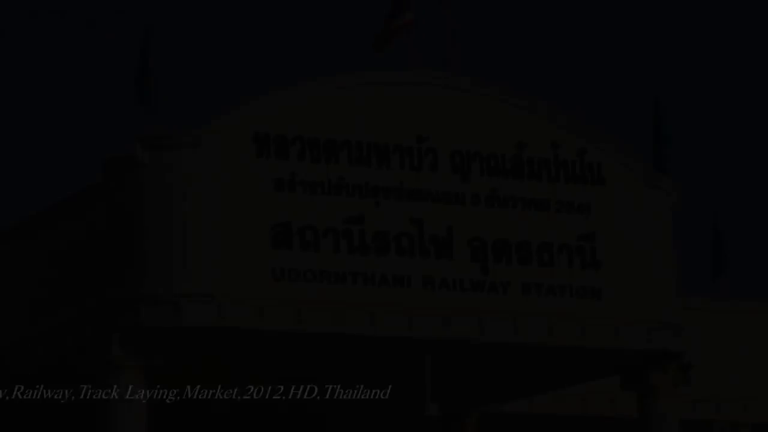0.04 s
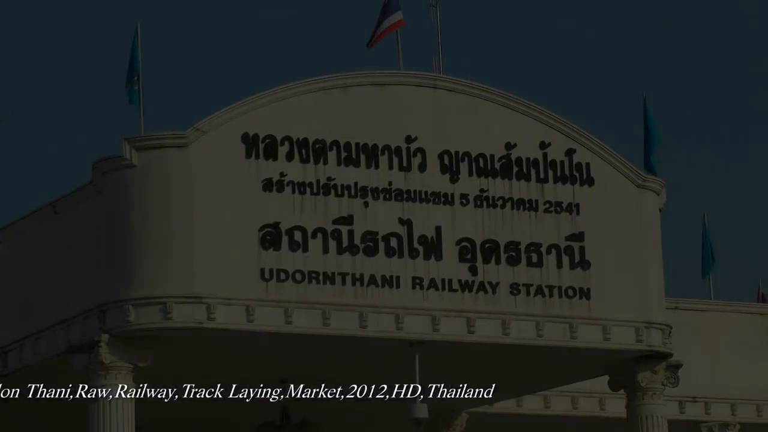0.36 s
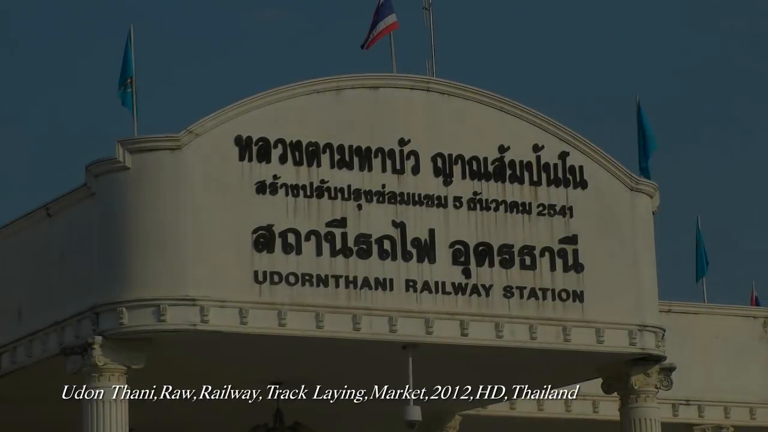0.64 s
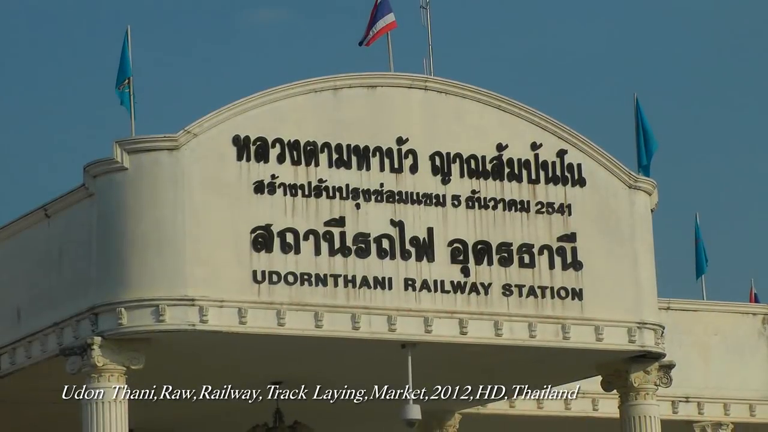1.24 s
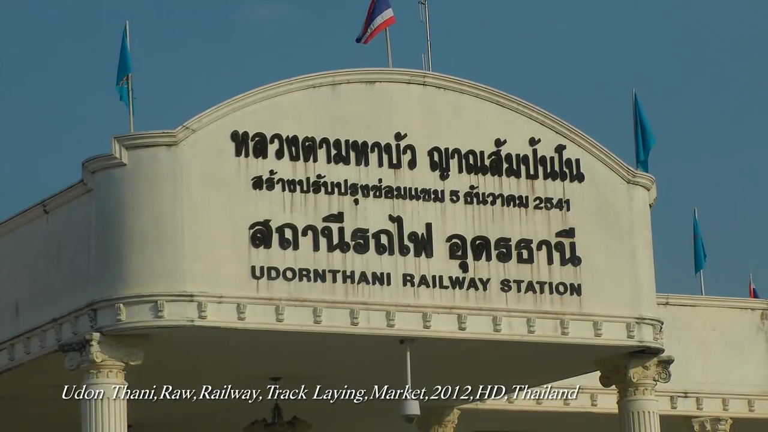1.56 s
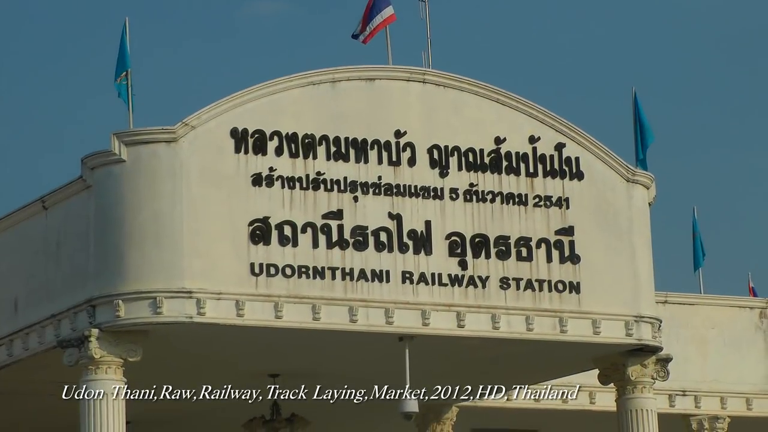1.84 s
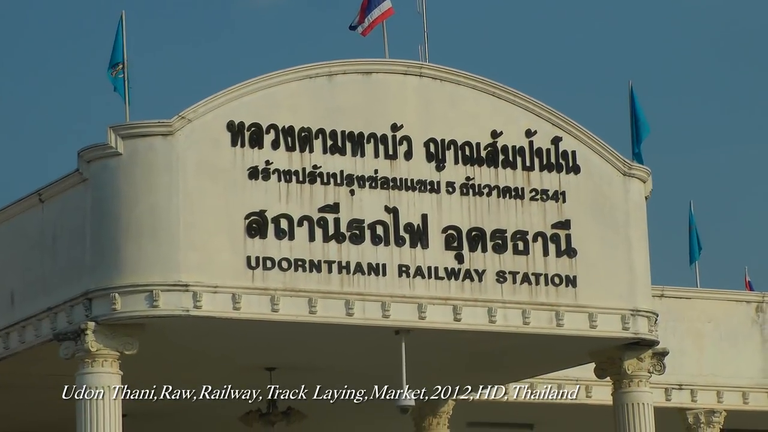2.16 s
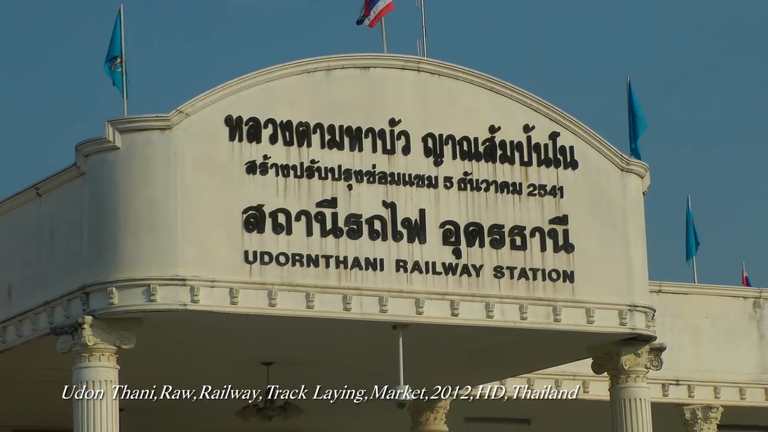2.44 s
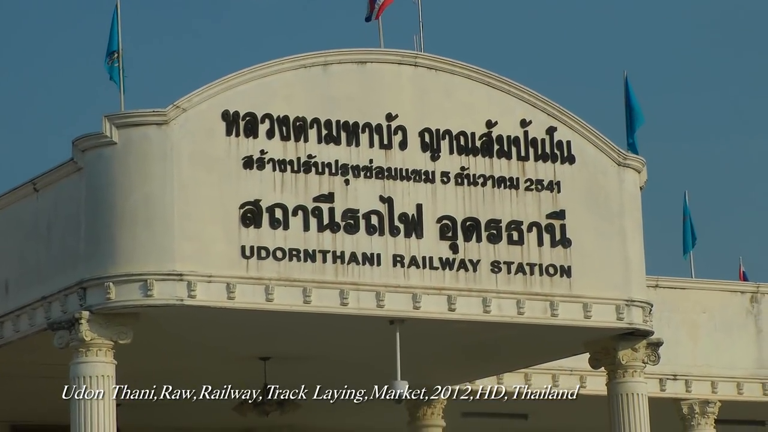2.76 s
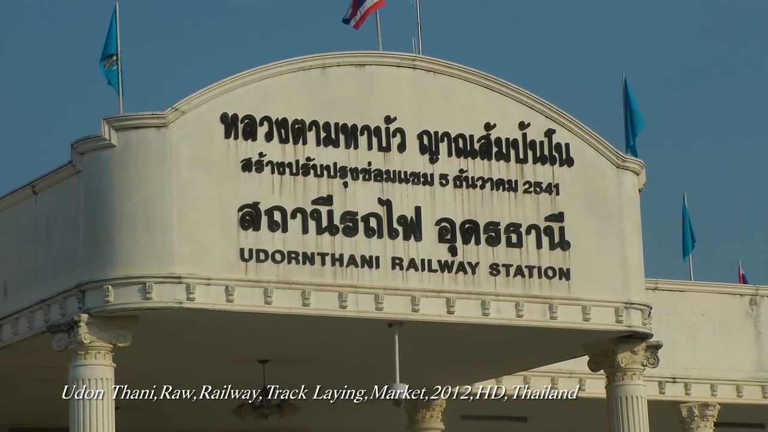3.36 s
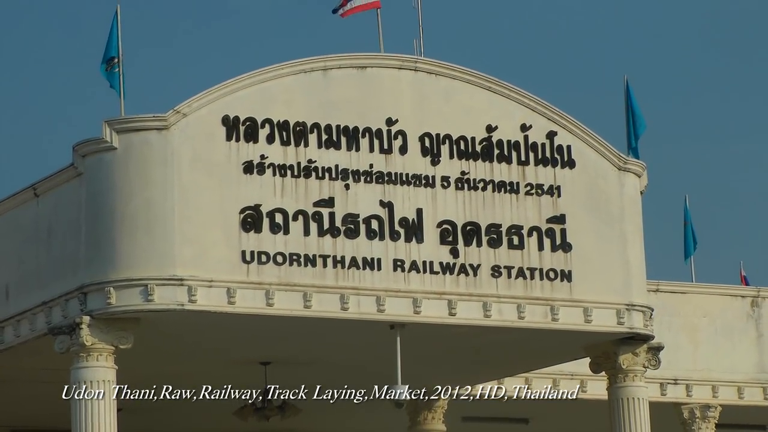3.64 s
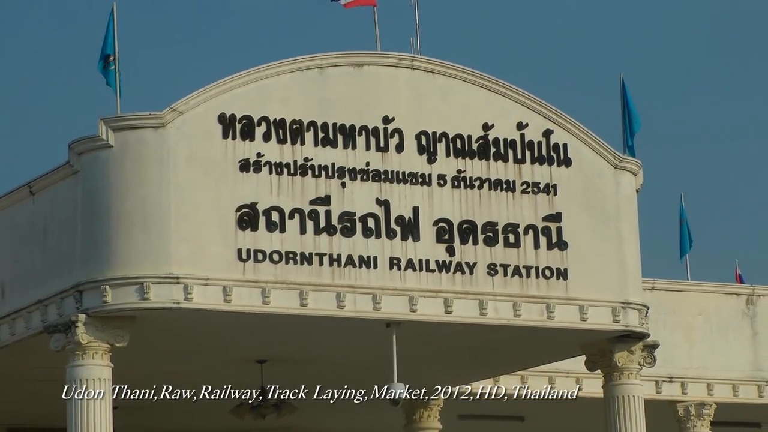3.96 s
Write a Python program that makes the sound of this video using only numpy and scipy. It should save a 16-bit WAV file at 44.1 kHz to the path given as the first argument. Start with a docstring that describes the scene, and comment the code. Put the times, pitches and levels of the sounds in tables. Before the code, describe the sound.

A low engine rumbles and gradually revs up over outdoor traffic noise and hiss.

```python
"""A four-cylinder engine pulls away in a station forecourt, climbing from about 1150 to 1850 rpm.
Its firings ring the exhaust pipe, gas noise chuffs once a turn, crankshaft orders boom as they cross
pipe resonances, and now and then the exhaust kicks with a dull thump. Behind it sits a bed of machine
hum, traffic rumble and bright street hiss, dotted with ticks, two thin whines and a faint squeal.
The whole scene fades in over the first second."""
import sys
import numpy as np
from scipy import signal
from scipy.fft import rfft, irfft, next_fast_len
from scipy.io import wavfile
from scipy.ndimage import map_coordinates

SR = 44100
rng = np.random.default_rng(int(sys.argv[2]) if len(sys.argv) > 2 else 0)


def generate_wav(sig):
    """Save sig (samples, or channels by samples) to the path in sys.argv[1] as 16-bit PCM at SR."""
    pcm = np.round(np.clip(np.atleast_2d(sig).T, -1, 1) * 32767).astype(np.int16)
    wavfile.write(sys.argv[1], SR, pcm)


N = 176400
T = np.arange(N) / SR


def amp(db):
    """Decibels to gain."""
    return 10 ** (np.asarray(db) / 20)

def unit(x):
    """Normalise to rms 1."""
    return x / np.sqrt(np.mean(x ** 2) + 1e-20)

def curve_at(points, hz):
    """Read a curve of (f/Hz, value) points on a log frequency axis."""
    freqs, values = np.transpose(points)
    return np.interp(np.log(hz + 1), np.log(freqs + 1), values)

def automation(rows):
    """One automation lane, a value per sample, for each column after the time."""
    times, *columns = np.transpose(rows)
    return [np.interp(T, times, column) for column in columns]

def wobble(rate):
    """A smooth random modulator with `rate` knots a second."""
    return map_coordinates(rng.standard_normal(1024), [T * rate], mode="wrap")

def eq(x, response):
    """Zero-phase EQ; `response` maps frequency to gain."""
    size = next_fast_len(N + SR // 2)
    return irfft(rfft(x, size) * response(np.fft.rfftfreq(size, 1 / SR)), size)[..., :N]

def ring(x, spectrum, size=16384):
    """Let x excite a resonant body: a minimum-phase filter with the given spectrum."""
    cepstrum = irfft(np.log(amp(curve_at(spectrum, np.fft.rfftfreq(size, 1 / SR)))))
    causal_fold = np.r_[1, np.full(size // 2 - 1, 2), np.zeros(size // 2)]
    impulse_response = irfft(np.exp(rfft(cepstrum * causal_fold)))
    return signal.fftconvolve(x, impulse_response)[:N]

def noise_band(centre, width):
    """A bell-shaped band of noise, rms 1."""
    return unit(eq(rng.standard_normal(N), lambda hz: np.exp(-((hz - centre) / width) ** 2 / 2)))

def tone(hz, db, waver_db, slip_rad):
    """One partial, wavering a little in level and phase."""
    gain = np.sqrt(2) * amp(db + waver_db * wobble(3.79))
    return gain * np.sin(2 * np.pi * (hz * T + rng.random()) + slip_rad * wobble(5.07))

# stereo width of the noise layers: f/Hz, side against mid/dB
NOISE_WIDTH = [(30, -3), (60, -18), (150, -19.5), (230, -25.5), (400, -20), (600, -14.5), (1000, -6),
               (1450, -7.5), (2000, -13), (3300, -3), (4200, -15), (5000, -26), (6000, -9.5), (7200, -31),
               (9500, -9), (13000, -2), (15000, -6)]
def stereo_noise(spectrum):
    """Coloured noise of rms 1, nearly mono in the upper bass and low mids."""
    def mid_side_gains(hz):
        mid_db = curve_at(spectrum, hz)
        return amp([mid_db, mid_db + curve_at(NOISE_WIDTH, hz)])
    mid, side = eq(rng.standard_normal((2, N)), mid_side_gains)
    return unit(np.array([mid + side, mid - side]))

# accent of each firing in the cycle: level/dB
FIRING_ACCENTS = [-6, -5.5, -4, -5]
# lateness of each firing at the tailpipe: delay/firing intervals
FIRING_LAG = [0.0019, 0.0996, 0.0095, 0.1194]
# tone of the exhaust pipe and body: f/Hz, gain/dB
PIPE_EQ = [(25, -36), (42, -39), (58, -15.5), (90, -21.5), (125, -11), (170, -5), (225, 2.5), (265, -5.5),
           (320, -0.5), (420, -6.5), (490, -19), (560, -11), (750, -20.5), (900, -32.5), (1500, -40.5),
           (4000, -91)]
def firings(turns, scatter_db, jitter_s, count=256):
    """Two exhaust pulses a turn ring the pipe, uneven from cylinder to cylinder."""
    firing = np.arange(count)
    timing_spread, level_spread = rng.standard_normal((count, 2)).T
    due_turns = (firing + np.take(FIRING_LAG, firing, mode="wrap")) / 2
    onsets = np.interp(due_turns, turns, T, right=2 * T[-1]) + jitter_s * timing_spread
    gains = amp(np.take(FIRING_ACCENTS, firing, mode="wrap") + scatter_db * level_spread)
    pulses = np.bincount(np.abs(onsets * SR).astype(int), gains, N)[:N]
    return unit(ring(pulses, PIPE_EQ))

# colour of the exhaust gas noise: f/Hz, level/dB
GAS_SPECTRUM = [(25, -52), (70, -24), (130, -9), (215, 0.5), (270, -1), (320, -5.5), (420, -2.5),
                (490, -13), (570, -10), (780, -20), (920, -36), (2000, -20.5), (8000, -50)]
def chuff(turns, depth_db):
    """Rushing exhaust gas that pumps once a crankshaft turn."""
    pump_db = depth_db * np.cos(2 * np.pi * (turns - .1))
    return unit(stereo_noise(GAS_SPECTRUM) * amp(pump_db))

# strong crankshaft orders: multiple of crank speed, level/dB ahead of the pipe
CRANK_ORDERS = [(2, -33), (3, -33), (4, -27), (5, -27), (6, -26.5), (7, -32), (8, -29.5), (9, -27.5),
                (10, -32), (11, -28.5), (12, -31), (13, -30), (14, -33), (15, -32), (16, -33), (17, -35)]
# narrow pipe resonances: f/Hz, half-width/Hz, boost/dB
PIPE_BOOMS = [(167, 6, 4), (223, 7, 5.5), (241, 6, 2), (445, 28, 7)]
def drone(speed, turns, waver_db, slip_rad):
    """Clean engine orders that boom as they sweep through the resonances of the pipe."""
    out = np.zeros(N)
    for order, db in CRANK_ORDERS:
        hz = order * speed
        boom_db = sum(boost / (1 + ((hz - centre) / width) ** 2) for centre, width, boost in PIPE_BOOMS)
        phase = 2 * np.pi * (order * turns + rng.random()) + slip_rad * wobble(8)
        out += amp(db + curve_at(PIPE_EQ, hz) + boom_db + waver_db * wobble(5.04)) * np.cos(phase)
    return out

# the rev climb: t/s, crankshaft speed/Hz
REVS = [(0, 19.1), (1.05, 20), (1.45, 19.7), (1.85, 22.6), (2.05, 22.8), (2.36, 24.3), (2.68, 25.9),
        (3.01, 27.8), (3.17, 29.7), (3.34, 28.7), (3.5, 29.2), (3.7, 30), (3.83, 29.8), (4, 31.1)]
# engine load as a fader ride: t/s, level/dB, extra drone level/dB
LOAD_RIDE = [(0, -5.5, -4), (1.1, -4.5, -1.5), (1.65, -3.5, -1), (1.74, -3, 0), (1.8, -8, -1),
             (1.87, -3, -1.5), (2.03, -1.5, -2), (2.17, -3.5, -1), (2.37, -3, 5), (2.62, -2, 3.5),
             (2.88, -2.5, 1), (3.02, -1.5, 3), (3.2, 0, 5), (3.32, -1.5, 2), (3.45, -.5, 3),
             (3.57, -2, 3.5), (3.68, 0, 4.5), (3.84, .5, 4), (4, 0, 2.5)]
def engine():
    """Firings, chuff and drone, locked to one crankshaft and swelling with the load."""
    speed, = automation(REVS)
    load_db, drone_db = automation(LOAD_RIDE)
    turns = np.cumsum(speed) / SR
    chug = amp(-30.5) * firings(turns, scatter_db=2.5, jitter_s=0.00016)
    breath = amp(-28.5) * chuff(turns, depth_db=3)
    boom = amp(drone_db) * drone(speed, turns, waver_db=2, slip_rad=0.2)
    return amp(load_db) * (chug + breath + boom)

# partials of the machine hum: f/Hz, level/dB
HUM_PARTIALS = [(76, -50), (100, -51.5), (200, -32.5), (224, -40.5), (300, -39.5), (400.5, -36),
                (587, -52.5), (785, -57)]
def machine_hum():
    """A machine running at constant speed holds a steady chord under the scene."""
    return sum(tone(hz, db, waver_db=-2.5, slip_rad=0.29) for hz, db in HUM_PARTIALS)

# colour of the street hiss: f/Hz, level/dB
HISS_SPECTRUM = [(300, -19.5), (700, -14.5), (950, -12.5), (1200, -9.5), (1310, -14.5), (1440, -3.5),
                 (1560, -14), (1720, -1), (2000, -0.5), (2600, -3.5), (3000, -11), (3400, -14), (4000, -5),
                 (5000, -7.5), (6100, -17), (6800, -12.5), (8700, -14.5), (11000, -21), (13000, -26),
                 (15500, -45)]
# fader ride on the hiss: t/s, level/dB, treble shelf/dB
HISS_RIDE = [(0, -37, 1.5), (.5, -35.5, 0), (1.1, -35.5, 0), (2.1, -35.5, 0.5), (2.27, -33.5, 1),
             (2.5, -34.5, -2), (2.62, -35, 1), (2.8, -35, 0.5), (3.08, -33.5, 1), (3.4, -34.5, 0),
             (3.55, -36, 0), (4, -35.5, 0)]
def street_hiss(flutter_db=1.0, shelf_hz=5870):
    """Bright, restless street air: the level flutters and the treble drifts."""
    level_db, shelf_db = automation(HISS_RIDE)
    hiss = stereo_noise(HISS_SPECTRUM)
    treble = eq(hiss, lambda hz: hz ** 4 / (hz ** 4 + shelf_hz ** 4))
    shelved = hiss + (amp(shelf_db) - 1) * treble
    return shelved * amp(level_db + flutter_db * wobble(60))

# colour of the traffic: f/Hz, level/dB
TRAFFIC_SPECTRUM = [(15, -73), (25, -43), (43, -31), (64, -24), (112, -11.5), (198, -2.5), (263, -4),
                    (301, -6), (340, -3.5), (395, -9.5), (487, -16.5), (583, -13), (647, -18.5), (763, -16),
                    (900, -30), (1170, -64), (1980, -120)]
def traffic_rumble(level_db=-28.5, swell_db=1):
    """Traffic blurred into a low, gently heaving bed of noise."""
    return amp(level_db + swell_db * wobble(8.7)) * stereo_noise(TRAFFIC_SPECTRUM)

# ticks and short spits of hiss: t/s, f/Hz, width/Hz, decay/s, level/dB
TICK_CUES = [(.322, 8330, 3000, .05, -29.5), (2.21, 9000, 3040, .08, -46), (2.286, 2700, 298.3, .03, -33),
             (2.391, 6300, 850, .007, -28.5), (2.848, 1950, 200, .02, -33), (3.015, 5487, 500, 0.059, -40)]
def ticks(attack_s=0.0015):
    """Bursts of bright noise with a sharp attack and a short tail."""
    out = np.zeros(N)
    for start, centre, width, decay, db in TICK_CUES:
        age = np.maximum(T - start, 0)
        envelope = (1 - np.exp(-age / attack_s)) * np.exp(-age / decay)
        out += amp(db) * noise_band(centre, width) * envelope
    return out

# high whines, cued at their crests: t/s, spread/s, f/Hz, level/dB
WHINE_CUES = [(1.335, 0.14, 12750, -63), (1.69, .09, 12800, -64)]
def whines(width_hz=150):
    """Thin bands of noise at the very top that swell and fade."""
    return sum(amp(db) * noise_band(hz, width_hz) * np.exp(-((T - crest) / spread) ** 2 / 2)
               for crest, spread, hz, db in WHINE_CUES)

# hard exhaust kicks: t/s, peak level/dB
THUMP_CUES = [(1.722, -17), (1.756, -17), (1.847, -17), (1.892, -16), (2.508, -15), (3.4, -14),
              (3.434, -12), (3.449, -12), (3.468, -10), (3.503, -12), (3.654, -12), (3.671, -14),
              (3.802, -13), (3.868, -13), (3.966, -11)]
# body of a thump: f/Hz, gain/dB
THUMP_EQ = [(30, -40), (90, -21), (160, 3), (230, -1.5), (350, -0.5), (440, -9), (520, -21), (750, -19),
            (950, -39), (3000, -82)]
def exhaust_thumps():
    """Now and then the exhaust kicks harder, with a short dull thump."""
    kicks = np.zeros(N)
    for start, db in THUMP_CUES:
        kicks[round(start * SR)] = amp(db)
    body_peak = np.abs(ring(signal.unit_impulse(N), THUMP_EQ)).max()
    return ring(kicks, THUMP_EQ) / body_peak

# inharmonic partials of the squeal: f/Hz, level/dB, fall/(dB per s)
SQUEAL_PARTIALS = [(1028, -52, 14), (1443, -51, 10), (1793, -54, 0), (1977, -46, 6), (2110, -52, 0),
                   (2213, -55, 0), (2815, -52.5, 8), (3117, -60, 0), (3698, -61, 0), (4021, -52.5, 4),
                   (4145, -57, 0), (4420, -55, 0), (4996, -57, 4), (5303, -52, 18), (5520, -51, 22),
                   (5960, -50, 90), (6234, -55, 60), (8559, -62, 8)]
def squeal(start_s=2.97, end_s=3.5, ramp_s=0.055, side_gain=0.63):
    """A faint, wide metallic ring, perhaps a brake; some partials die away early."""
    gate = np.clip(np.minimum(T - start_s, end_s - T) / ramp_s, 0, 1)
    age = np.maximum(T - start_s, 0)
    def voice():
        return sum(amp(-fall * age) * tone(hz, db, waver_db=3.0, slip_rad=0.35)
                   for hz, db, fall in SQUEAL_PARTIALS)
    mid, side = voice(), voice()
    return gate * (mid + side_gain * np.outer([1, -1], side))

# stereo balance of the mix: f/Hz, left minus right/dB
BALANCE = [(150, -0.18), (300, -1.1), (600, -0.7), (2500, -0.85), (4500, -.2), (8000, 0.26), (11000, 1.7)]
def scene():
    """Mix all layers, leaning slightly right, with the very top leaning left."""
    mix = engine() + machine_hum() + (street_hiss() + traffic_rumble())
    mix += ticks() + whines() + exhaust_thumps() + squeal()
    return eq(mix, lambda hz: amp(np.outer([.5, -.5], curve_at(BALANCE, hz))))

# master fader: t/s, level/dB
FADE_IN = [(0, -85), (.14, -80), (.2, -51), (.27, -35.5), (.34, -25), (.46, -17), (.62, -10.5), (.88, -5),
           (1.1, -2.5)]
def record(dry):
    """Fade the mix in and trim the top with a brick-wall low-pass."""
    fade_db, = automation(FADE_IN)
    cutoff_hz = 15720
    return eq(dry * amp(fade_db), lambda hz: hz < cutoff_hz)


dry = scene()
out = record(dry)
generate_wav(out)
```